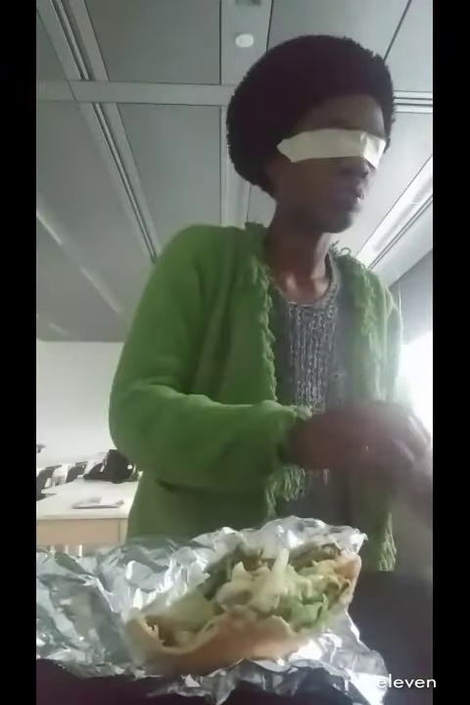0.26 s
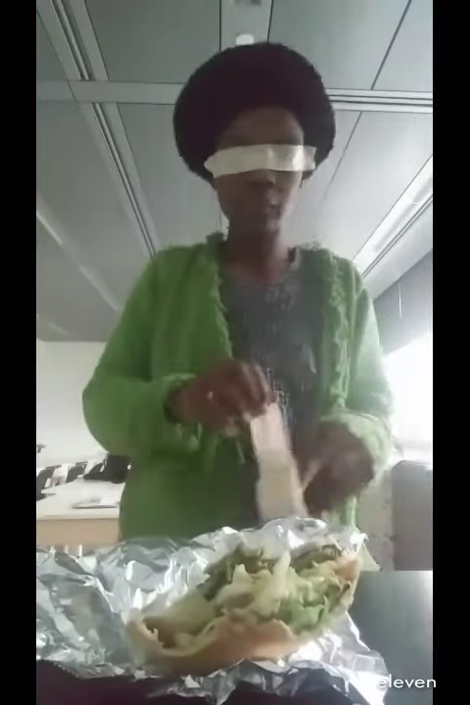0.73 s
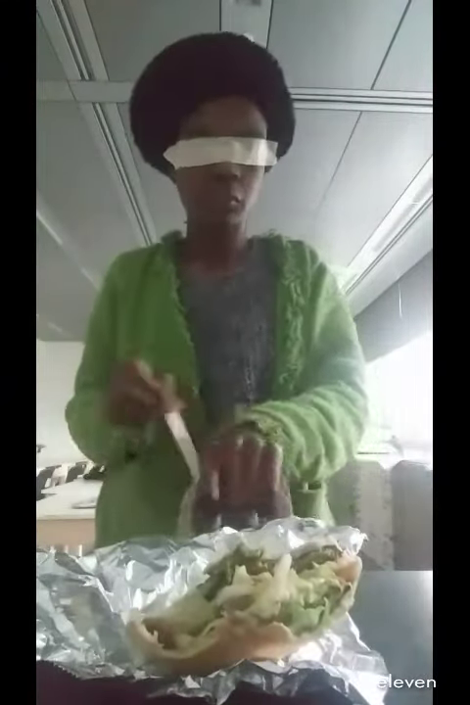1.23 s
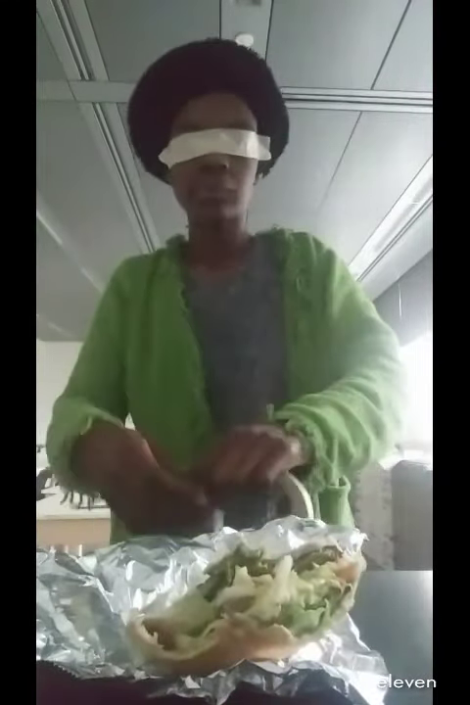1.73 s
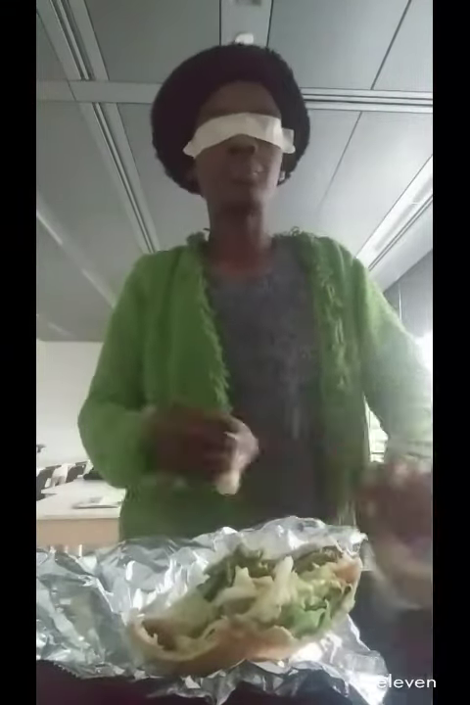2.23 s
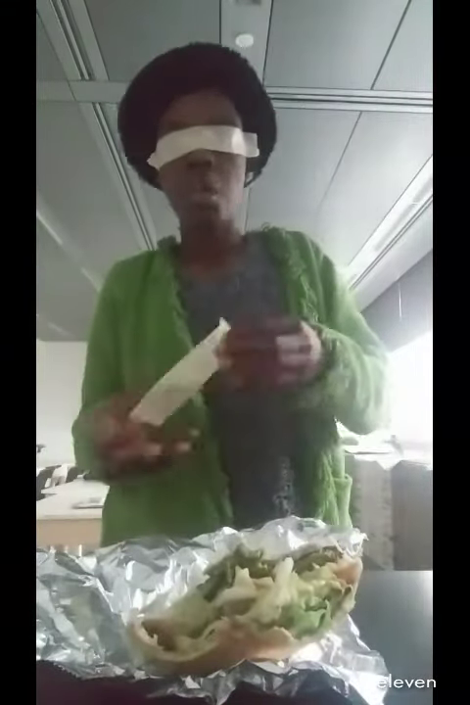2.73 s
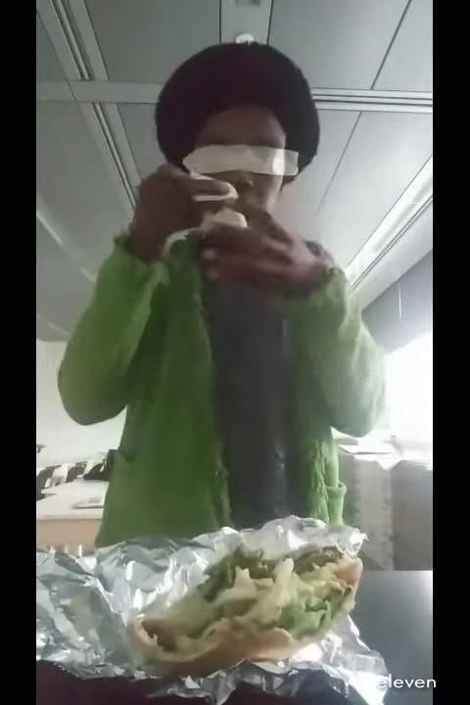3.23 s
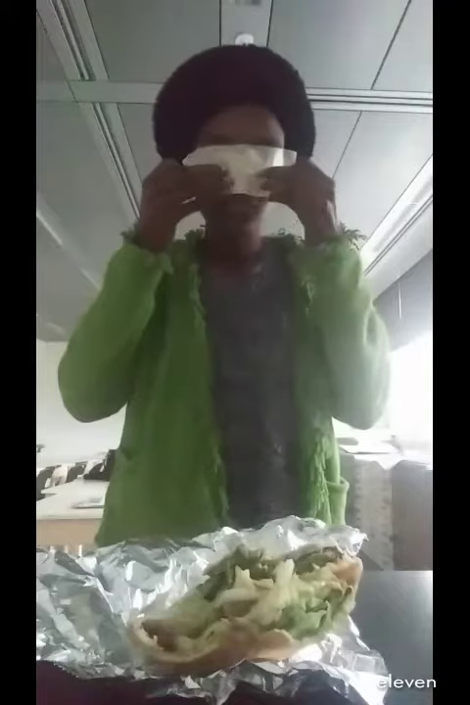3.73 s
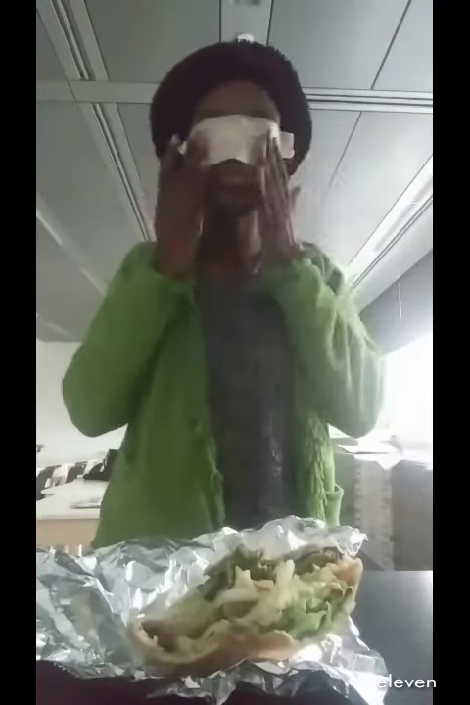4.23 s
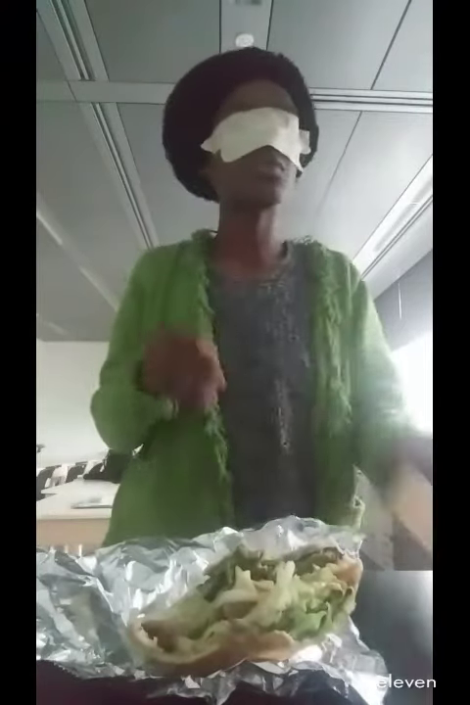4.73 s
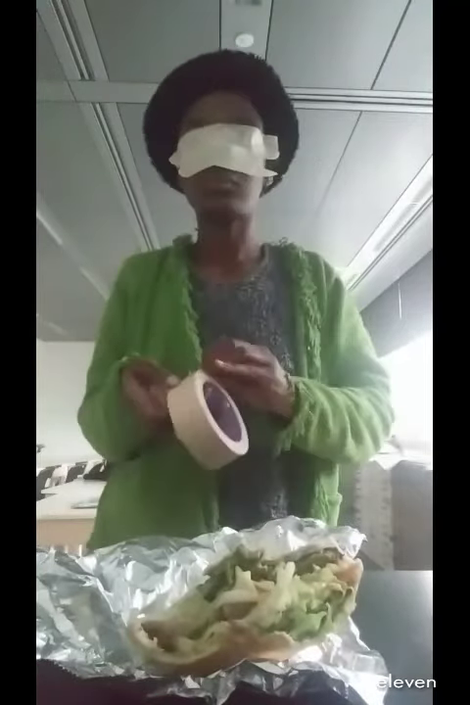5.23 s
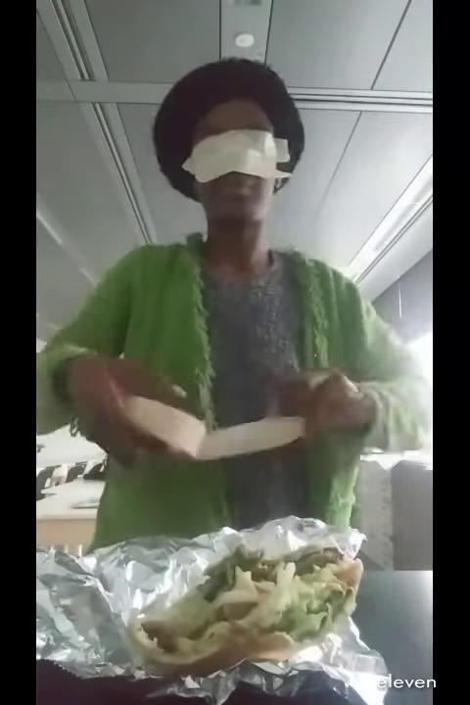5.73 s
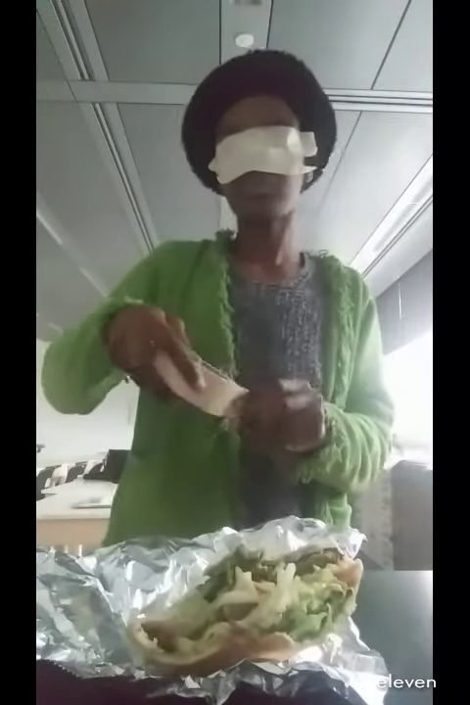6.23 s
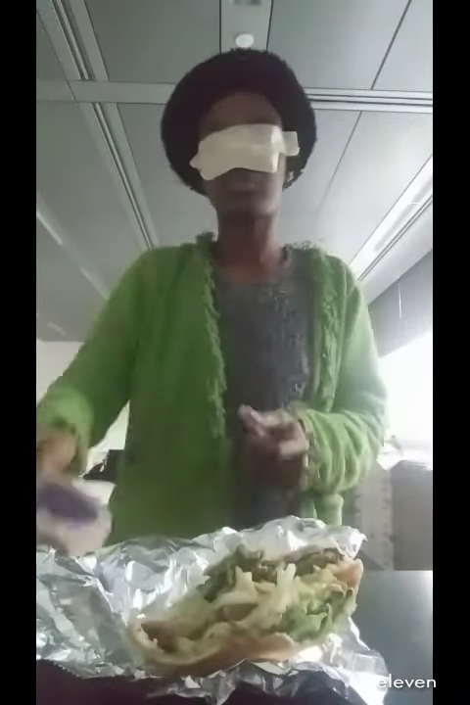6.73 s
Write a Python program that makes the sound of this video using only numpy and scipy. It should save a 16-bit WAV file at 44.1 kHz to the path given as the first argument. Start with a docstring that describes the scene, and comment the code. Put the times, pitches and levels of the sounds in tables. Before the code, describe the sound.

Hands work with masking tape close to the microphone in a dry office, over a faint ventilation hiss with a slight fan tone. After a small snap and some soft rubbing, the tape creaks and comes off its roll in short, sharp rips at about 0.6, 1.1, 1.4 and 2.1 seconds. At 2.3 seconds the cardboard roll is set on a table with a quick knock. From about 2.5 to 4.4 seconds there are only quiet crinkles, small ticks and fingers rubbing the tape smooth. A sharp snap comes at 4.8 seconds, followed by more quick rips between 5.1 and 5.5 seconds. The strip crackles and rustles, with crisp snaps around 5.9 and 6.4 seconds and a louder one at 6.6. Near 6.8 seconds the roll lands on the table again with a hollow double knock.

```python
"""Masking tape is pulled off its roll in short rips: glue threads part and drive the strip as a membrane.
Creases buckle with a snap or a faint crinkle, the stretched tape creaks, and fingers rub it smooth
by stick-slip friction. The cardboard roll, bumped softly by the hand, is twice set down on a table and
rings in its damped modes. A phone close by picks this up in a dry office, whose ventilation hisses
with a faint fan tone."""
import sys
import numpy as np
from scipy import signal
from scipy.fft import rfft, irfft, next_fast_len
from scipy.io import wavfile
from scipy.ndimage import map_coordinates

SR = 44100
rng = np.random.default_rng(int(sys.argv[2]) if len(sys.argv) > 2 else 0)


def dump_mix(stems):
    """Bounce the given channels to the path in sys.argv[1] as a 16-bit WAV at rate SR."""
    frames = np.atleast_2d(stems).T  # one column per channel
    limited = np.clip(frames, -1, 1)  # hard clip at full scale
    pcm = np.round(limited * 32767).astype(np.int16)
    wavfile.write(sys.argv[1], SR, pcm)


N = 307377


def amp(db):
    """Amplitude ratio of a level in decibels."""
    return 10 ** (np.asarray(db) / 20)


def unit(x):
    """Normalisation to an rms of 1."""
    return x / np.sqrt(np.mean(x ** 2) + 1e-20)


def along(points, hz):
    """Interpolation of (frequency [Hz], value) points on a logarithmic frequency axis."""
    freqs, values = np.transpose(points)
    return np.interp(np.log(hz + 1), np.log(freqs + 1), values)


def wobble(rate):
    """Random modulation: a spline through `rate` Gaussian knots a second."""
    knots = rng.standard_normal(int(N * rate / SR) + 4)
    return map_coordinates(knots, [np.arange(N) * rate / SR])


def coloured(x, gain_db):
    """Minimum-phase filtering: folding the cepstrum makes the response gain_db(hz) causal."""
    size = 2 * next_fast_len(len(x) // 2 + 2048)
    gain = amp(gain_db(np.fft.rfftfreq(size, 1 / SR)))
    cepstrum = irfft(np.log(gain + 1e-6), size)
    cepstrum[1:size // 2] *= 2
    cepstrum[size // 2 + 1:] = 0
    return irfft(rfft(x, size) * np.exp(rfft(cepstrum)), size)[:len(x)]


def add(track, start, sound):
    """Superposition of a sound on the track from `start` seconds on."""
    part = track[max(round(start * SR), 0):][:len(sound)]
    part += sound[:len(part)]


def clock(size=6000):
    """Time axis of one short event, in seconds."""
    return np.arange(size) / SR


def slips(rate, spread_db, size):
    """Stick-slip as shot noise: about `rate` impulses a second, of uneven strength, with rms 1."""
    chance, strength, side = rng.random(size), rng.standard_normal(size), rng.standard_normal(size)
    return unit((chance < rate / SR) * amp(spread_db * np.clip(strength, -2, 2)) * np.sign(side))


# Reverberation time of the office: (frequency [Hz], T60 [s])
ROOM_DECAY = [(150, 0.077), (700, 0.17), (2500, 0.13), (5000, 0.1), (9000, 0.054), (15000, .08)]
# Spectrum of the reflections: (frequency [Hz], gain [dB])
REFLECTION_SPECTRUM = [(200, 5), (900, 2), (1600, -13), (2100, 6), (2550, 4), (3300, 4), (5000, 2),
                       (9000, 4), (15000, -2.5)]
def office(x, wet_db):
    """Reverberation: diffuse reflections from table, body and walls follow the direct sound by 4 ms."""
    hz, t, noise = signal.stft(rng.standard_normal(SR // 4), SR, nperseg=128)
    decay = amp(along(REFLECTION_SPECTRUM, hz)[:, None] - 60 * t / along(ROOM_DECAY, hz)[:, None])
    tail = signal.istft(noise * decay, SR, nperseg=128)[1]
    tail = np.pad(tail, (int(0.004 * SR), 0))
    response = amp(wet_db) * tail / np.linalg.norm(tail)
    response[0] = 1  # direct path
    return signal.fftconvolve(x, response)


# Spectrum of the moving air: (frequency [Hz], gain [dB])
AIRFLOW_SPECTRUM = [(15, -70.5), (25, -37), (84, -28), (200, -12), (236, -7.5), (270, -10), (405, -9),
                    (714, -10), (1020, -9), (1290, -13.5), (1560, -12.5), (3160, -24.5), (5000, -24.5),
                    (16000, -39)]
# Peaks and a dip in the duct response: (centre [Hz], width [Hz], gain [dB])
DUCT_BANDS = [(390, 180, 5), (1730, 500, 4), (2170, 590, -4.5), (2450, 450, 10), (3250, 500, 3.5),
              (4460, 1100, 4)]
def ventilation():
    """Flow noise: steady air is filtered by the ducts, beside a slightly unsteady fan tone."""
    ducts = lambda hz: sum(db * np.exp(-(2 * (hz - mid) / width) ** 2) for mid, width, db in DUCT_BANDS)
    air = unit(coloured(rng.standard_normal(N), lambda hz: along(AIRFLOW_SPECTRUM, hz) + ducts(hz)))
    fan_hz = 1005 + 14 * wobble(60)
    fan = np.sin(2 * np.pi * np.cumsum(fan_hz) / SR) * amp(2 * wobble(30))
    return amp(-58.5) * air + amp(-65.5) * fan


def voicing(hz, body_db, air_db):
    """Spectral tilt in dB: a long slack strip has more body (lows), a short taut one more air (highs)."""
    return along([(1700, body_db), (2700, 0.057), (5500, 0.0053), (8500, air_db)], hz)


def resonance(hz, ring_hz):
    """Membrane resonance: length and tension of the free tape pick out one peak, 7.5 dB high."""
    half_width_hz = 90 + 0.04 * ring_hz
    return 7.5 / (1 + ((hz - ring_hz) / half_width_hz) ** 2)


# Spectrum of skin on crepe paper: (frequency [Hz], gain [dB])
FRICTION_SPECTRUM = [(200, -33.5), (700, -4.5), (1200, -3), (1600, 0), (2100, -6), (2600, 3.5), (3400, -1),
                     (4600, 3), (5900, -1), (8200, -8.5), (11800, -8.5), (14000, -15), (15700, -35.5)]
def handled_tape(hz, body_db, air_db):
    """Frequency response in dB of the strip under the fingers, tilted by its tension."""
    return along(FRICTION_SPECTRUM, hz) + voicing(hz, body_db, air_db)


# Activity of the hands on the strip: (time [s], amplitude factor [1])
HAND_ACTIVITY = [(0, 0.9), (0.9, 0.6), (1.9, 0.8), (2.6, 1.1), (4.1, 1.1), (4.4, 0.44), (5, 0.25),
                 (5.3, 0.98), (5.6, 0.64), (6.25, 1), (6.8, 1.2), (6.9, 0.6)]
def crinkle():
    """Crackling noise: tiny creases in the handled strip tick in loose clumps."""
    clumps = amp(6 * np.tanh(wobble(6)))
    ticks = clumps * slips(rate=260, spread_db=4, size=N)
    activity = np.interp(np.arange(N) / SR, *np.transpose(HAND_ACTIVITY))
    crackle = coloured(ticks, lambda hz: handled_tape(hz, body_db=8, air_db=-1.5))
    return amp(-65) * activity * unit(office(crackle, wet_db=-12)[:N])


# Bumps of the hand on the roll: (time [s], level [dB])
HAND_BUMPS = [(0.745, -43), (1.333, -51)]
def bumps():
    """Heavily damped impact: a soft hand gives one dull push."""
    out, t = np.zeros(N), clock()
    spectrum = [(40, -18), (150, -6.5), (300, -14.5), (900, -4), (5000, -62)]
    envelope = (1 - np.exp(-t / 0.0013)) * np.exp(-t / 0.011)
    for start, db in HAND_BUMPS:
        thud = unit(coloured(rng.standard_normal(len(t)), lambda hz: along(spectrum, hz)))
        add(out, start, amp(db) * envelope * thud)
    return out


# Fingers smoothing the tape: (time [s], duration [s], level [dB], tautness as treble gain [dB])
FINGER_STROKES = [(0.049, 0.051, -50.5, -1), (0.222, 0.24, -54.5, 10), (0.34, 0.2, -55.5, 1.5),
                  (0.524, 0.14, -48, 2.5), (1.163, 0.054, -48.5, 1.5), (1.277, 0.056, -63.5, 6),
                  (1.582, 0.11, -54, -2), (1.818, 0.14, -48.5, -2), (2.195, 0.13, -50.5, -1.5),
                  (2.414, 0.063, -57, 2), (2.532, 0.04, -60, 5.5), (2.781, 0.1, -58.5, 0.5),
                  (3.071, 0.027, -48, 0.5), (3.292, 0.016, -54.5, 5.5), (3.33, 0.065, -55, 0),
                  (3.515, 0.034, -54.5, 1.5), (3.782, 0.035, -54, -0.5), (3.946, 0.087, -58, 0),
                  (4.167, 0.079, -52.5, -0.5), (4.296, 0.047, -63, 0), (5.011, 0.02, -63.5, 10),
                  (5.17, 0.069, -42.5, 10.5), (5.193, 0.32, -51.5, 1), (5.664, 0.13, -56, -0.5),
                  (5.886, 0.046, -42.5, -0.5), (6.172, 0.039, -48.5, -2.5), (6.212, 0.067, -49, -2.5),
                  (6.447, 0.12, -45, 12), (6.479, 0.016, -40.5, 7), (6.551, 0.19, -54.5, 1),
                  (6.79, 0.023, -44, 10)]
def rubbing():
    """Sliding friction: skin on crepe paper sheds fine grains of sound with sticky crackles among them."""
    out, t = np.zeros(N), clock(size=15000)
    for start, length, db, taut_db in [*FINGER_STROKES, *slipping_grips()]:
        body_db = 5 - 1.3 * taut_db
        pressure = np.sin(np.pi * np.minimum(t / length, 1))
        uneven_grip = amp(4 * np.interp(t, np.linspace(0, t[-1], num=50), rng.standard_normal(50)))
        grains = slips(rate=5000, spread_db=3, size=len(t))
        crackles = slips(rate=250, spread_db=5, size=len(t))
        # the tauter the strip, the more one resonance sings
        sing = lambda hz: 0.75 * max(6.5 - body_db, 0) * np.exp(-((hz - 5950) / 1000) ** 2)
        rasp = unit(coloured(grains + crackles, lambda hz: handled_tape(hz, body_db, taut_db) + sing(hz)))
        add(out, start, office(amp(db) * pressure * uneven_grip * rasp, wet_db=-16.5))
    return out


# Creaks of the stretched tape: (time [s], relative level [dB], pitch [Hz])
TAPE_CREAKS = [(0.534, -46.5, 1760), (.566, -33, 1660), (0.578, -36, 1690), (.588, -31, 1600),
               (0.605, -37, 1620), (1.18, -37.5, 1700), (1.331, -44.5, 1490), (4.722, -41.5, 661),
               (6.375, -41.5, 1600)]
def creaks():
    """Stick-slip excitation: a brief swell of slips rings a single resonance of the strip."""
    out, t = np.zeros(N), clock(size=1000)
    swell = np.exp(-((t - t.mean()) / 0.0035) ** 2)
    for centre, db, pitch_hz in TAPE_CREAKS:
        narrow_band = lambda hz: -20 * np.log10(1 + ((hz - pitch_hz) / 130) ** 2)
        creak = swell * coloured(slips(rate=9500, spread_db=1, size=len(t)), narrow_band)
        add(out, centre - t.mean(), office(amp(db - 10) * unit(creak), wet_db=-7))
    return out


# The roll meets the table: (time [s], level [dB], cutoff [Hz], hollow ring [dB], loss per rock [dB])
ROLL_LANDINGS = [(2.2664, -13.5, 1240, -2, 5.5), (6.7543, -21, 610, 11.5, 32), (6.8127, -14, 880, 11, 10)]
def contacts():
    """Dissipative rocking: the rim grazes, lands, then tips from edge to hard edge, weaker each time."""
    rock_s, rim_cutoff_hz, rim_hollow_db = 0.0074, 2470, 2
    for start, db, cutoff_hz, hollow_db, loss_db in ROLL_LANDINGS:
        yield start - 0.0045, db - 16.5, cutoff_hz, hollow_db  # graze
        yield start, db, cutoff_hz, hollow_db
        for rock in range(1, 5):
            delay = (rock + 0.097 * rng.normal()) * rock_s
            yield start + delay, db - rock * loss_db, rim_cutoff_hz, rim_hollow_db


# Modes of the cardboard roll on the table: (frequency [Hz], level [dB], T60 [s])
ROLL_MODES = [(244, -16.5, 0.0098), (389, -1, 0.023), (657, 1.5, 0.031), (876, -8, 0.066),
              (1395, -20.5, 0.057), (1514, -23, 0.12), (1643, -4, 0.037), (2410, -8, 0.045),
              (3730, -23, 0.014)]
def knocks():
    """Modal vibration: each contact rings the roll; the softer it is, the less it excites high modes."""
    out, t = np.zeros(N), clock()
    onset = 1 - np.exp(-t / 0.001)
    for start, db, cutoff_hz, hollow_db in contacts():
        ring = sum(amp(level + rng.normal(0, 1) - 60 * t / t60) * np.sin(2 * np.pi * hz * t)
                   for hz, level, t60 in ROLL_MODES)
        scuff = amp(8 - 60 * t / 0.026) * rng.standard_normal(len(t))
        radiation = [(40, -27), (130, -14), (230, 0.5), (330, 0.95 * hollow_db), (410, hollow_db),
                     (600, 2), (2800, 2.5), (4500, -5), (12000, -8.5)]
        response = lambda hz: along(radiation, hz) - 10 * np.log10(1 + (hz / cutoff_hz) ** 4)
        knock = coloured((ring + scuff) * onset, response)
        add(out, start, office(amp(db) * knock, wet_db=-15))
    return out


def flips():
    """Snap-through: each stroke upsets a few small creases, the softer the tauter the strip."""
    spacing_s, most, air_db = 0.05, 12, -11.5
    for start, length, db, taut_db in FINGER_STROKES:
        place, strength, pitch = rng.random(most), rng.standard_normal(most), rng.standard_normal(most)
        for k in range(np.clip(round(length / spacing_s), 1, most)):
            delay = min((k + place[k]) * spacing_s, length)
            flip_db = db + 5.5 - max(taut_db, 0) + 3.5 * strength[k]
            ring_hz = 2130 * 2 ** (0.5 * pitch[k])
            yield start + delay, flip_db, air_db, ring_hz


# Spectrum of a buckling crease: (frequency [Hz], gain [dB])
CREASE_SPECTRUM = [(100, -57), (550, -21), (1000, -2), (1550, 3.5), (2100, -6), (2600, -3), (3400, -8),
                   (5200, -5.5), (8000, -12), (12000, -13.5), (16000, -30)]
# A smaller facet rings higher and has less body: (ring [Hz], body [dB])
FACET_BODY_GAIN = [(1450, 1), (1900, -0.5), (2500, -10.5), (5500, -12.5)]
# Mid-sized facets ring most clearly: (ring [Hz], multiple of the strip's resonance peak [1])
FACET_CLARITY = [(1500, 0.6), (2000, 0.8), (2500, 1.7), (5500, 0.8)]
# The strip snaps taut or a crease flips: (time [s], relative level [dB], relative air [dB], ring [Hz])
TAPE_SNAPS = [(0.0143, -25.5, -16.5, 2400), (0.587, -32, -3, 1800), (0.621, -28, -18, 1890),
              (0.856, -42, -17, 1750), (1.256, -38.5, -21, 1470), (1.6087, -35.5, 0.5, 2040),
              (1.666, -36.5, -13, 2020), (1.9756, -33, -18, 1770), (2.0323, -28, -20, 1850),
              (2.727, -44, -12, 1406), (2.8527, -36, -5, 2100), (2.878, -37, -5, 1460),
              (3.0908, -35, -9, 2020), (3.128, -42.5, -7, 2940), (3.4378, -30, -21, 2510),
              (3.4907, -39.5, -10, 2490), (3.5911, -34, -21, 1960), (3.822, -35, -13, 2430),
              (3.8433, -29.5, -38, 2540), (3.8894, -25, -6.5, 5900), (4.0084, -28, -49, 2430),
              (4.0294, -41, -36, 1690), (4.768, -12, -16, 1916), (5.2405, -24.5, -11.5, 2590),
              (5.7969, -28, -9, 1918), (5.891, -19.5, -17, 1640), (5.9846, -39.5, -31, 1578),
              (6.4156, -17.5, -5.5, 1480), (6.6103, -8.5, -5, 1670), (6.7094, -27, -19, 2370),
              (6.949, -31.5, -6.5, 4400)]
def snaps():
    """Buckling: a crease loads up, lets go within milliseconds and rings the facet next to it."""
    out, lead_s = np.zeros(N), 0.008
    t = clock(size=2400) - lead_s
    release = np.exp(-(t / 0.0021) ** 2)
    load_and_settle = 0.13 * np.exp(np.minimum(t, 0) / 0.001 - np.maximum(t, 0) / 0.005)
    for start, db, air_db, ring_hz in [*TAPE_SNAPS, *flips()]:
        burst = (release + load_and_settle) * slips(rate=42000, spread_db=9.5, size=len(t))
        tilt = lambda hz: voicing(hz, along(FACET_BODY_GAIN, ring_hz), 0.74 * air_db + 5)
        facet = lambda hz: along(FACET_CLARITY, ring_hz) * resonance(hz, ring_hz)
        snap = coloured(burst, lambda hz: along(CREASE_SPECTRUM, hz) + tilt(hz) + facet(hz))
        add(out, start - lead_s, office(amp(db + 2.5) * snap, wet_db=-13))
    return out


# Pulls and tears, with rumble, stretch and recoil relative to the level: (time [s], duration [s],
# level [dB], body [dB], air [dB], low rumble [dB], ring of the strip [Hz], stretch [dB], recoil [dB])
TAPE_PULLS = [(0.639, 0.027, -16.5, -2.5, -3.5, -33.5, 1066, -16.5, -24.5),
              (1.06, 0.034, -16, 0, -1, -25.5, 5280, -16, -35.5),
              (1.1279, 0.0083, -14, -2.5, -2, -25.5, 1350, -26, -8.5),
              (1.442, 0.027, -15.5, -3, -1.5, -19, 1050, -36, -8),
              (2.1335, 0.011, -18.5, -3, -5.5, -39, 1680, -74, -36),
              (5.1113, 0.0115, -21.5, -2, 1.5, -43, 5560, -62, -8.5),
              (5.238, 0.0052, -23.5, -13, 0.5, -27, 2400, -25, -19),
              (5.39, 0.026, -13.5, -0.5, 0, -40, 2540, -13.5, -3),
              (5.5209, 0.013, -14.5, -3, -1, -17.5, 1360, -16, -10)]
def pulls():
    """Elastic loading and release: the glue stretches, gives way, and the slackened strip recoils."""
    stretch_s, recoil_s = 0.0095, 0.0066
    recoil_body_db, recoil_air_db, recoil_hz = -2.5, -7, 2400
    for start, length, db, body_db, air_db, rumble_db, ring_hz, stretch_db, recoil_db in TAPE_PULLS:
        yield start - stretch_s, stretch_s, db + stretch_db, body_db, air_db, rumble_db, ring_hz
        yield start, length, db, body_db, air_db, rumble_db, ring_hz
        yield start + length, recoil_s, db + recoil_db, recoil_body_db, recoil_air_db, rumble_db, recoil_hz


def slipping_grips():
    """Slip under load: the fingers slide on the taut strip from just before each pull to just after."""
    before_s, after_s, taut_db = 0.04, 0.06, 5
    for start, length, db, *_ in TAPE_PULLS:
        yield start - before_s, before_s + length + after_s, db - 35, taut_db


# Spectrum of the peeling strip: (frequency [Hz], gain [dB])
PEEL_SPECTRUM = [(100, -42), (300, -44.5), (600, -16.5), (1030, -3), (1550, 3), (1780, 2.5), (2070, -9),
                 (2520, -3.5), (3500, -6.5), (4700, -0.5), (6000, -3.5), (8700, -9.5), (12200, -8),
                 (15000, -20), (16000, -38.5)]
def rips():
    """Forced vibration: parting glue threads drive the free strip like a membrane, over a low rumble."""
    out, lead_s = np.zeros(N), 0.02
    t = clock() - lead_s
    give = (1 - np.exp(-np.maximum(t, 0) / 0.00034)) ** 2
    lead_in = 0.04 * np.exp(np.minimum(t, 0) / 0.0035)  # a faint, quick swell just before each rip
    rumble_spectrum = [(30, -20.5), (130, -18), (330, 5), (600, 1), (950, -27.5), (2000, -50)]
    for start, length, db, body_db, air_db, rumble_db, ring_hz in pulls():
        envelope = np.maximum(give, lead_in) * np.exp(-np.maximum(t - length, 0) / 0.0028)
        threads = slips(rate=5000, spread_db=3, size=len(t))
        membrane = lambda hz: voicing(hz, body_db, air_db) + resonance(hz, ring_hz)
        strip = unit(coloured(threads, lambda hz: along(PEEL_SPECTRUM, hz) + membrane(hz)))
        rumble = unit(coloured(rng.standard_normal(len(t)), lambda hz: along(rumble_spectrum, hz)))
        rip = envelope * (strip + amp(rumble_db) * rumble)
        add(out, start - lead_s, office(amp(db) * rip, wet_db=-12))
    return out


def scene():
    """Linear superposition of all sources at one microphone."""
    return (rips() + snaps() + creaks() + knocks() + bumps() + rubbing() + crinkle() + ventilation())[None]


def record(dry):
    """Soft saturation and band limiting: the phone rounds the highest peaks and cuts the top treble."""
    ceiling, cutoff_hz = 0.6, 15700
    rounded = dry / (1 + np.abs(dry / ceiling) ** 6) ** (1 / 6)
    hz = np.fft.rfftfreq(N, 1 / SR)
    return irfft(rfft(rounded) / np.sqrt(1 + (hz / cutoff_hz) ** 160), N)


dry = scene()
out = record(dry)
dump_mix(out)
```